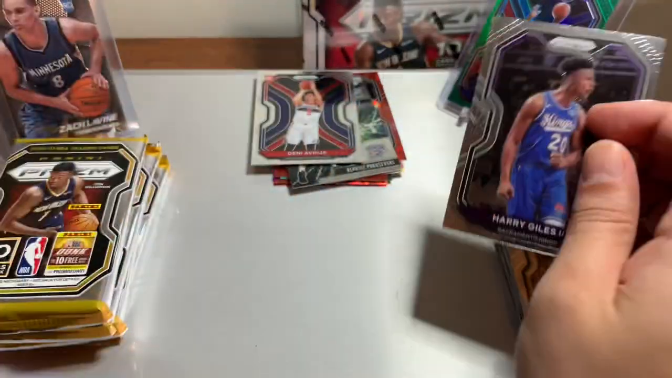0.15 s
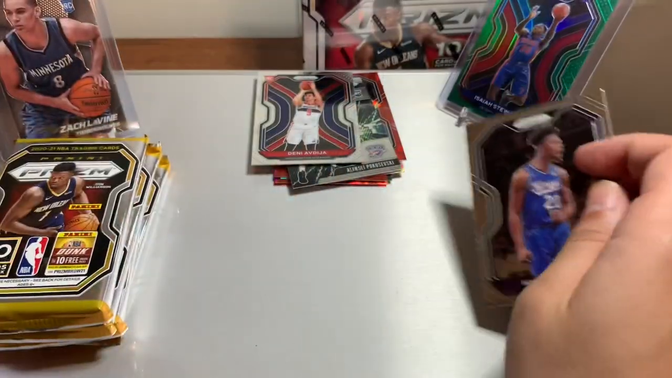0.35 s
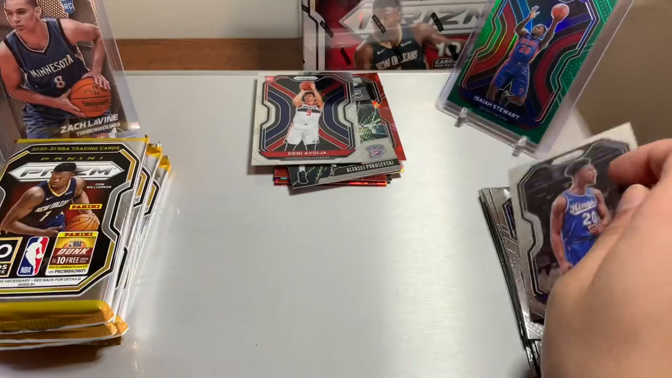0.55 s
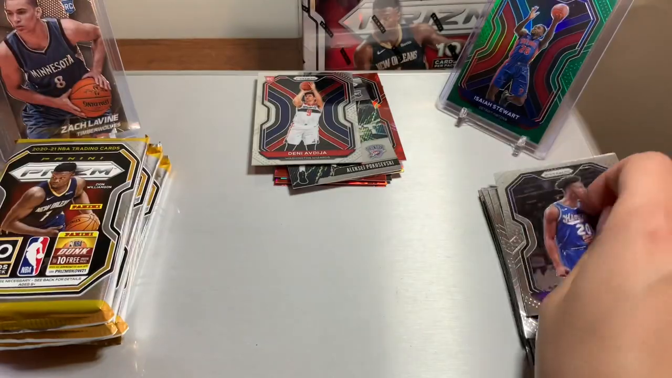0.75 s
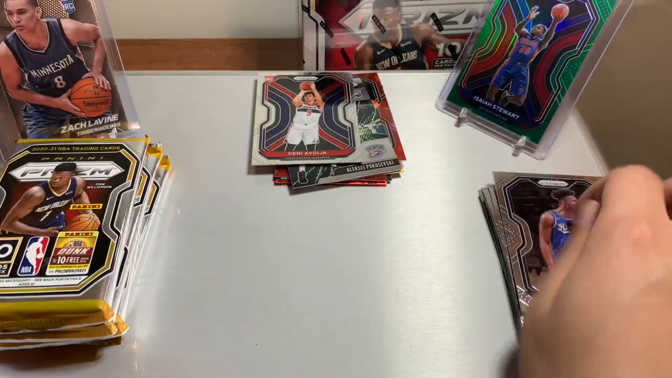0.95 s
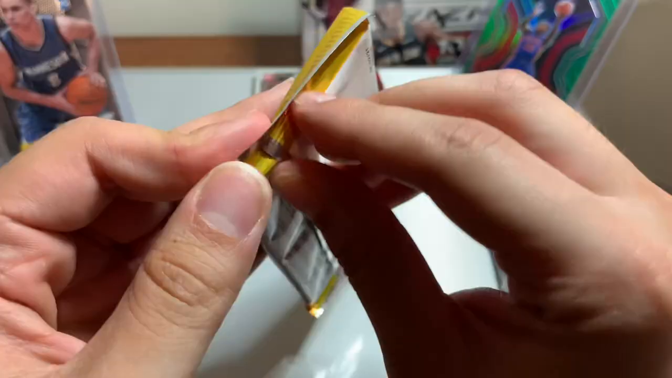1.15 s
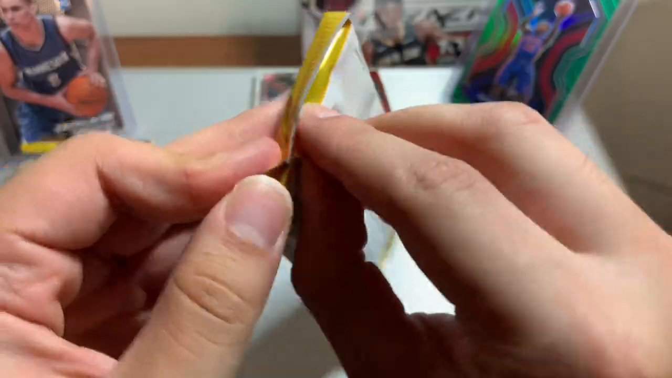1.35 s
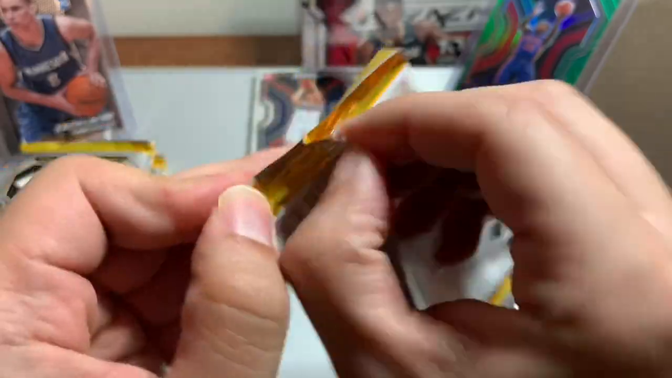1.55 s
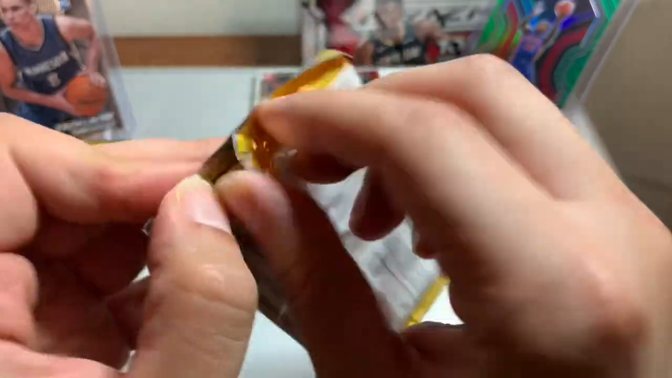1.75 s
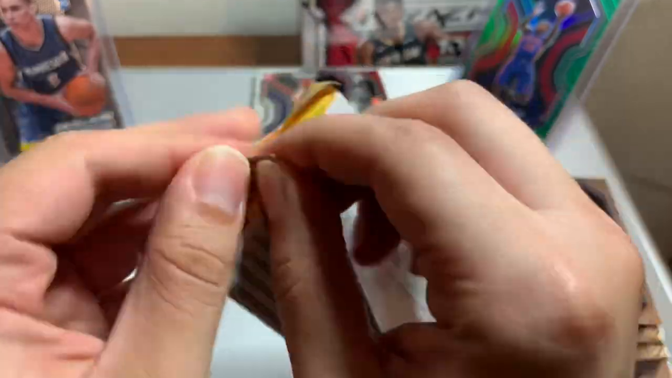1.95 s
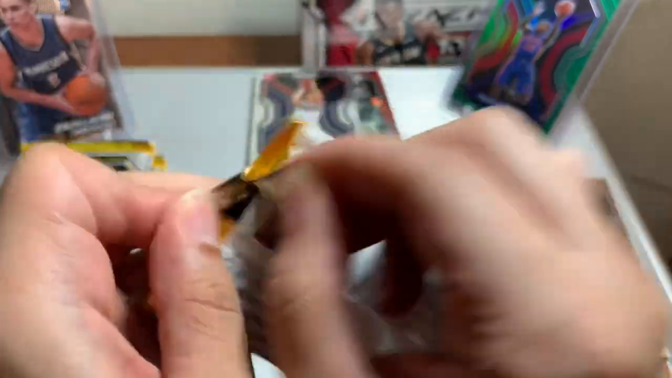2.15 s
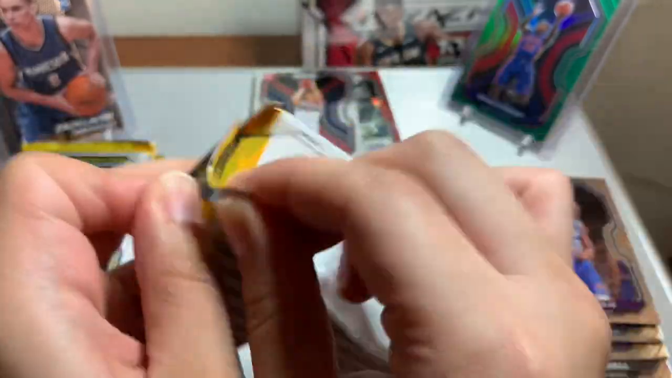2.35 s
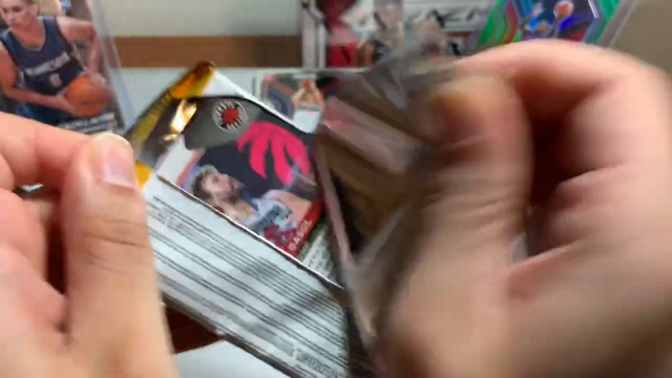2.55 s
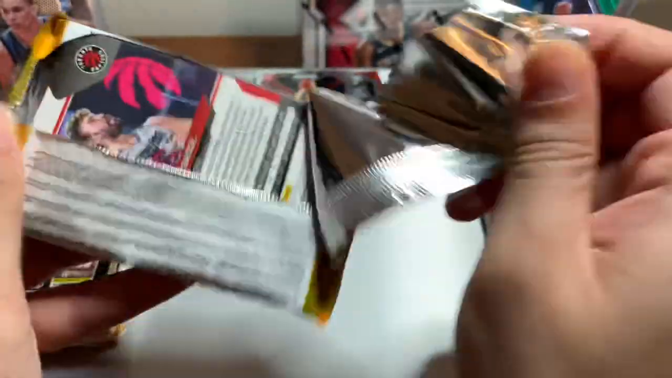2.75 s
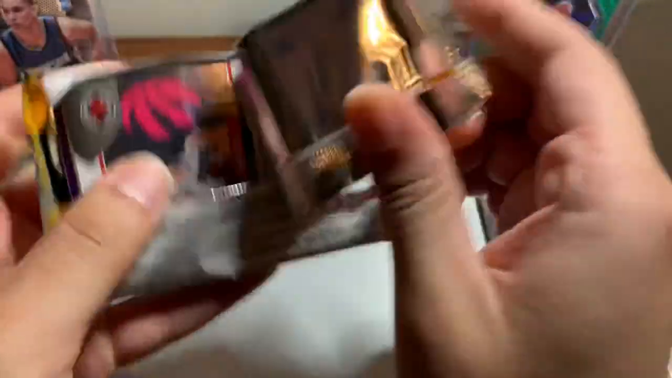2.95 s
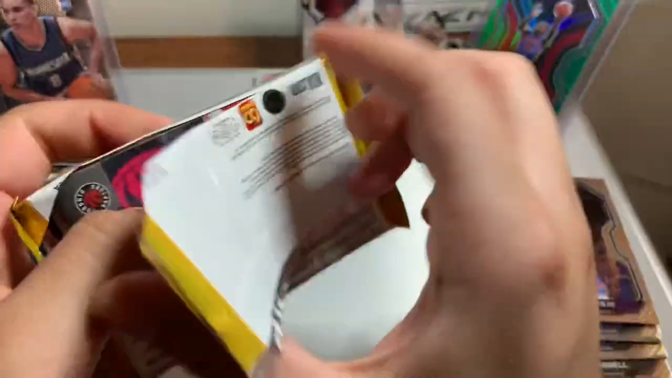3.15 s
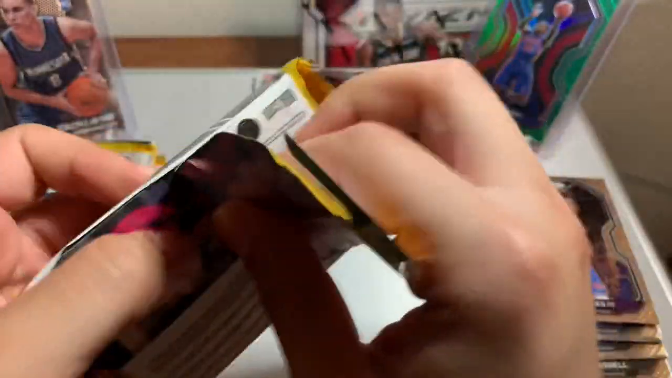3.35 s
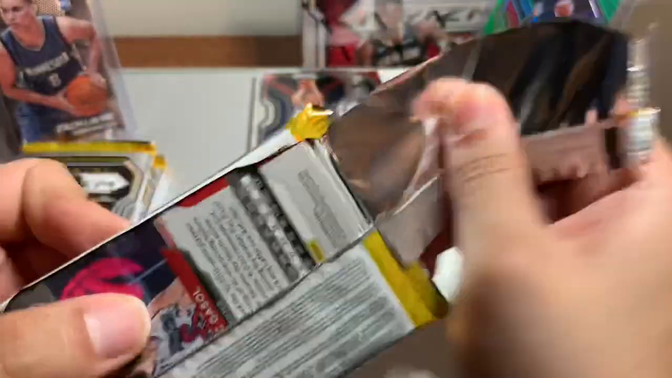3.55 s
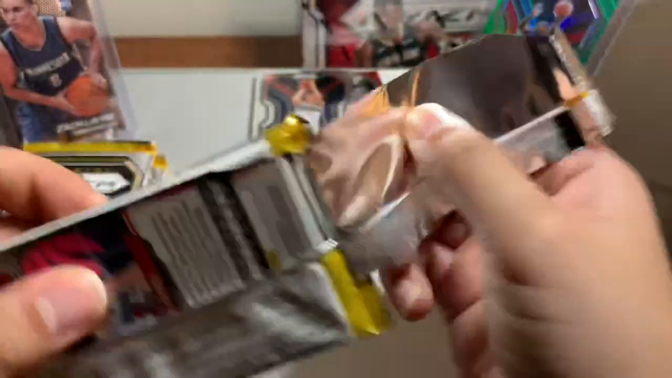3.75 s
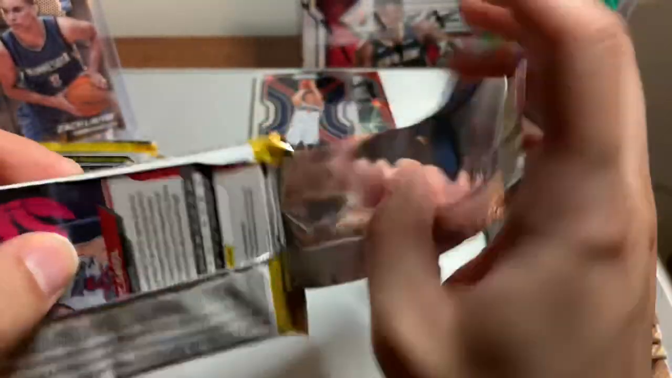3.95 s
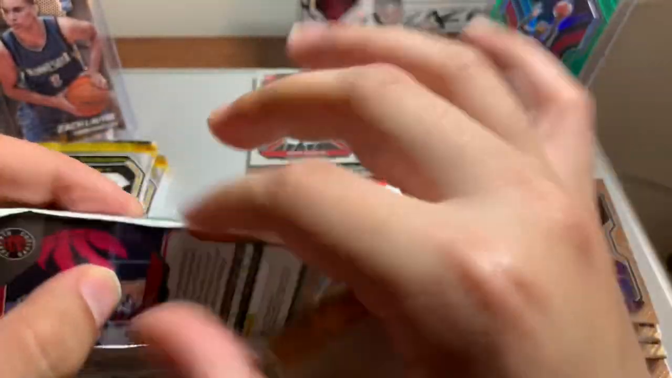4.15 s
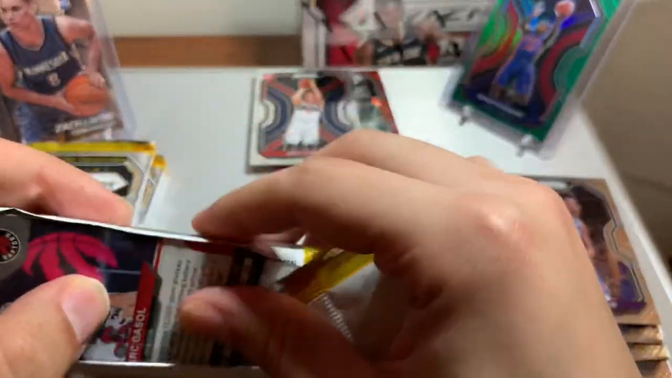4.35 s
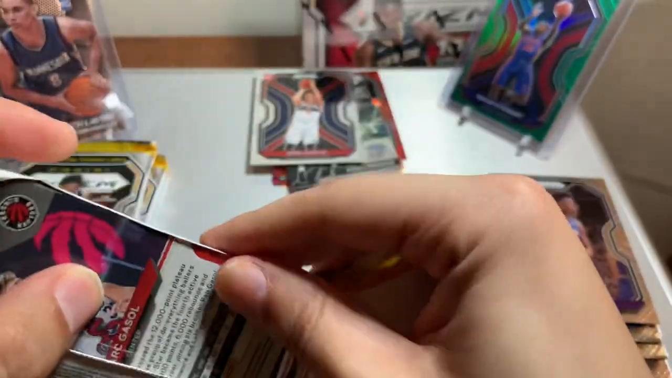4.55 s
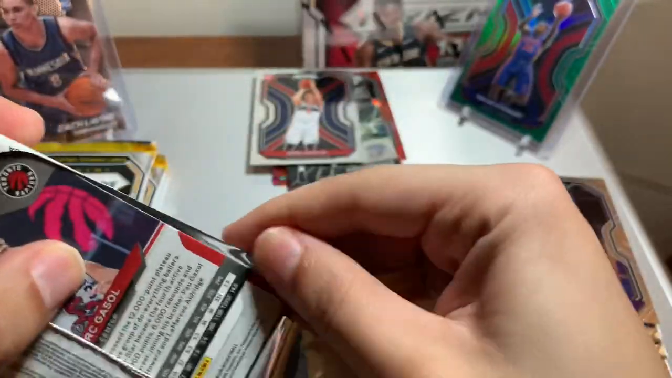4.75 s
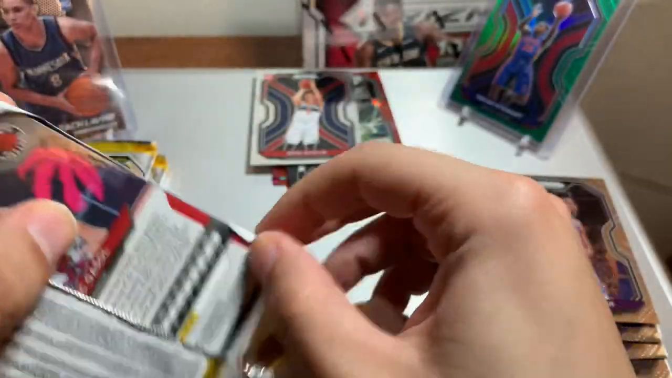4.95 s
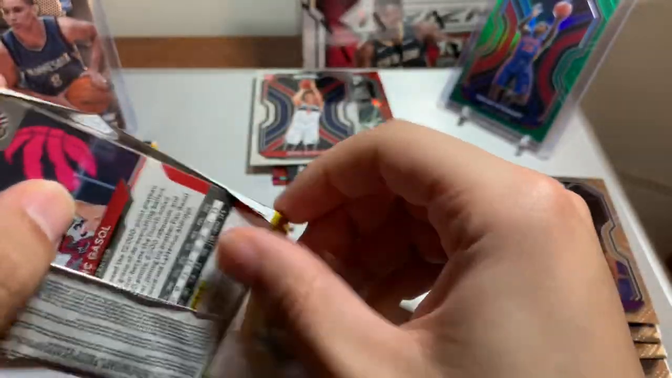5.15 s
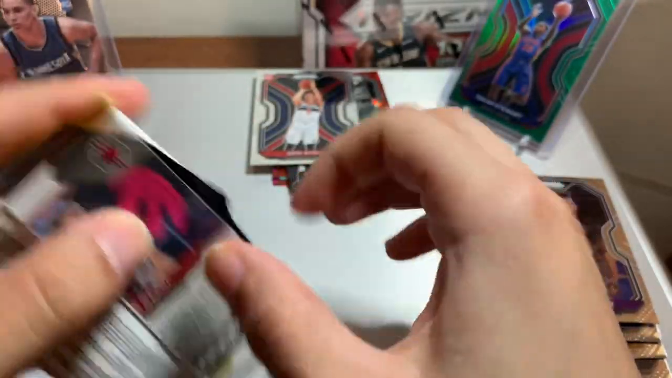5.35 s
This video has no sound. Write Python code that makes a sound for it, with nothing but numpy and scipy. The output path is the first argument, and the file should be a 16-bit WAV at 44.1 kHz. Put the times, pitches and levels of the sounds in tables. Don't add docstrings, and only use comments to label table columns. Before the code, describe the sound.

Quiet card taps in a hushed room, a brief lull, then loud close foil crackling, sharp tearing bursts and thinning rustles.

```python
import sys
import numpy as np
from scipy import signal
from scipy.fft import rfft, irfft
from scipy.io import wavfile
from scipy.ndimage import uniform_filter1d, map_coordinates

SR = 44100
rng = np.random.default_rng(int(sys.argv[2]) if len(sys.argv) > 2 else 0)


def volts_from_db(level):
    exponent = np.asarray(level, float) / 20
    return 10 ** exponent


def waveform_to_disk(signal):
    frames = np.transpose(np.atleast_2d(signal))
    scaled = np.clip(frames, -1, 1) * 32767
    samples = np.round(scaled).astype(np.int16)
    wavfile.write(sys.argv[1], SR, samples)


N = 238581
HZ = np.fft.rfftfreq(N + N % 2 + 4096, 1 / SR)
LONG = 2 * (len(HZ) - 1)
FOIL_START_S = 1.186
TURN_HZ = 5300


def evened(x):
    return x / np.sqrt(np.mean(x ** 2) + 1e-20)


def drift(shape, width):
    noise = rng.standard_normal(shape)
    return evened(uniform_filter1d(uniform_filter1d(noise, width), width))


def read(points, hz):
    f, value = np.transpose(points)
    return np.interp(np.log(hz + 1), np.log(f + 1), value)


def band(x, lo_hz, hi_hz):
    sos = signal.butter(3, [lo_hz, min(hi_hz, SR / 2.1)], "band", fs=SR, output="sos")
    return signal.sosfilt(sos, x)


def curves(rows, slower=0.74):
    t = np.arange(0, N + 32, 32) / SR
    s, db, rise, fall = np.array(rows)[:, :4].T[..., None]
    away = np.maximum((s - t) / rise, (t - s) / fall) / slower
    return volts_from_db(db - 20 * away)


def total(swells, rest_db):
    level = np.sqrt((swells ** 2).sum(0) + volts_from_db(rest_db) ** 2)
    return np.interp(np.arange(N), np.arange(len(level)) * 32, level)


# pitch_hz, likeness [0-1]
PORT_LIKENESS = [(60, .92), (900, .8), (1400, .35), (2500, .5), (3300, .25), (4200, .55), (5400, .15),
                 (6600, .8), (8400, .95), (16000, .9)]
# pitch_hz, left_over_right_db
LEFT_LOUDER = [(60, 1.5), (130, 4), (290, 3.5), (640, 9.5), (1410, 8.5), (3100, -0.5), (6820, -1.5),
               (15000, -0.5)]
# pitch_hz, left_lag_radians
HOUSING_TURN = [(350, -.5), (1100, .2), (1400, 3), (3000, 3), (3500, 1), (4500, 0), (5300, -1.)]


def ports(views):
    a, b = rfft(views, LONG)
    like = np.clip(read(PORT_LIKENESS, HZ), 0, 1)
    tilt = volts_from_db(read(LEFT_LOUDER, HZ) / 2)
    treble_lag_s = .000207
    lag = read(HOUSING_TURN, HZ) + 2 * np.pi * np.maximum(HZ - TURN_HZ, 0) * treble_lag_s
    left = a * tilt * np.exp(-1j * lag)
    right = (like * a + np.sqrt(1 - like ** 2) * b) / tilt
    return irfft([left, right], LONG)[:, :N]


# pitch_hz, level_db [per Hz]
HUSH_COLOUR = [(18, -38), (30, -20), (70, -14.5), (168, -9), (461, -36), (6710, -48.5), (8750, -44.5),
               (11400, -44), (15300, -48), (17000, -75)]


def hush():
    z = rfft(rng.standard_normal((2, LONG))) * volts_from_db(read(HUSH_COLOUR, HZ))
    low = irfft(z * (HZ < TURN_HZ), LONG)[:, :N]
    high = irfft(z * (HZ >= TURN_HZ), LONG)[:, :N]
    x = low + ports(high)
    return volts_from_db(-69.5) * x / band(x, 199, 17000).std()


# peak_s, level_db, rise_s, fall_s
DESK_BUMPS = [(0.0, -45, 0.038, 0.025), (.69, -55.5, 1.14, 0.13), (1.42, -39.5, 0.015, 0.15),
              (1.51, -45, 0.23, 0.15), (2.17, -56, 0.11, 0.045), (2.4, -63, 0.3, 1.2),
              (3.3, -60.5, 2.6, 0.57), (3.48, -43, 0.041, 0.072), (3.95, -56.5, 0.39, 2.3),
              (4.75, -52.5, 0.087, 0.15), (5.2, -58.5, 0.32, 1.5)]
# peak_s, level_db, rise_s, fall_s
AIR_GUSTS = [(.33, -47, 0.088, 0.17), (1.43, -53.5, 0.23, 0.21), (2.23, -45, 0.059, 0.071),
             (2.59, -34, 0.056, 0.087), (2.65, -35, 0.24, 0.066), (2.79, -44, 0.032, 0.041),
             (2.91, -41.5, 0.025, 0.031), (3.27, -46, 0.0037, 0.11), (3.46, -25, 0.024, 0.041),
             (3.83, -35, 0.019, 0.0051), (3.93, -49, 0.47, 0.18), (4.04, -54, 0.013, 0.36),
             (5.3, -54, 0.26, 0.74)]


def rumble():
    desk_rest_db, air_rest_db = -66.5, -69.5
    deep, air = rng.standard_normal((2, 2, N))
    deep = band(band(deep, 45.3, 165), 19.0, 79.6)
    deep = evened(deep) * volts_from_db(6.5) * total(curves(DESK_BUMPS), desk_rest_db)
    air = band(band(air, 100, 398), 100, 398)
    air = signal.lfilter([.02], [1, -.98], air)
    return deep + evened(air) * total(curves(AIR_GUSTS), air_rest_db)


# lowest_hz, highest_hz, rise_s, fade_s [60 dB]
SHEET_FAMILIES = [
    (5300, 20400, 0.0001, 0.0047),
    (1490, 5010, 0.00036, 0.01),
    (255, 1237, 0.00063, 0.0095),
]


def rings(count, ring=0.99, size=1400, colour_db=0.5):
    t, out = np.arange(size) / SR, []
    noise = rng.standard_normal((count, 3, 2, size))
    life = rng.random((count, 3, 1, 1))
    lumps = drift((count, 1, 1, size // 2 + 1), 30)
    noise = irfft(rfft(noise) * volts_from_db(colour_db * lumps), size)
    for k, (lo_hz, hi_hz, rise, t60) in enumerate(SHEET_FAMILIES):
        age = t / (ring * t60 * (.8 + .4 * life[:, k]))
        fall = volts_from_db(-60 * age) + volts_from_db(-20 - 12 * age)
        fall = fall * np.linspace(1, 0, size)
        onset = (1 - np.exp(-t / rise)) ** 2
        sound = band(noise[:, k] * fall * onset, lo_hz, hi_hz)
        sound = sound / np.linalg.norm(sound, axis=-1, keepdims=True)
        out.append(sound * np.sqrt(0.025 * ring * t60 * SR))
    return np.stack(out, 1)


def strike(rows, family_db, ring=1., colour_db=2.6):
    out = np.zeros((2, N + 1400))
    gains = volts_from_db(np.transpose(family_db))[..., None, None]
    sounds = (rings(count=len(rows), ring=ring, colour_db=colour_db) * gains).sum(1)
    for row, sound in zip(rows, sounds):
        out[:, round(row[0] * SR):][:, :1400] += sound
    return out[:, :N]


# pitch_hz, fade_s [60 dB]
ROOM_FADE = [(300, 0.043), (2000, 0.17), (6000, 0.091), (15000, 0.0081)]


def room(x):
    taps = np.zeros((2, SR // 2))
    at = np.arange(60, SR // 2 - 20, 20) + rng.integers(0, 20, (2, (SR // 2 - 61) // 20))
    np.put_along_axis(taps, at, rng.choice([-1., 1.], at.shape), 1)
    hz, t, z = signal.stft(taps, SR, nperseg=128)
    fading = volts_from_db(-60 * t / read(ROOM_FADE, hz)[:, None])
    tail = signal.istft(z * fading, SR, nperseg=128)[1]
    return signal.fftconvolve(x, tail / np.linalg.norm(tail[0]), axes=1)[:, :N]


# start_s, middle_db, treble_db [over middle], low_db [over middle]
CARD_TAPS = [(0.0938, -57, 13.5, -24), (0.1662, -55.5, 4, -19), (0.279, -53.5, -12, -6),
             (0.3098, -33, -9, -1.5), (0.335, -39.5, -33, -29), (0.363, -63, -22, -8), (0.5, -70, 25, -24),
             (0.816, -53, 1, -14), (0.8585, -54.5, 5, -12), (0.531, -70.5, -8, 4), (0.852, -60, 15, -10)]


def cards():
    _, db, high_db, low_db = np.transpose(CARD_TAPS)
    levels = [db + high_db + 2.0, db + 1.0, db + low_db + 8.0]
    taps = strike(CARD_TAPS, levels, ring=1.5, colour_db=3.)
    a, b = signal.lfilter([.5], [1, -.75], taps)
    heard = np.array([0.88 * a, 0.17 * a + 0.76 * b])
    return heard + volts_from_db(-4.5) * room(heard)


# peak_s, pitch_hz, level_db, rise_s, fall_s
CARD_SQUEAKS = [
    (.168, 2600, -60, .002, .003),
    (.827, 2580, -65, .006, .006),
    (.829, 2020, -54, .009, .008),
    (.827, 1510, -66, .012, .01),
    (.829, 6900, -69, .008, .007),
    (.935, 950, -72, .004, .006),
    (.962, 1000, -70, .005, .008),
    (1.131, 1750, -72, .003, .012),
]


def squeaks():
    t, out = np.arange(N) / SR, np.zeros(N)
    wobble = evened(uniform_filter1d(rng.standard_normal(N), size=60))
    for s, hz, db, rise, fall in CARD_SQUEAKS:
        away = np.maximum((s - t) / rise, (t - s) / fall)
        out += volts_from_db(db - 20 * away ** 2) * np.sin(2 * np.pi * hz * t + 0.62 * wobble)
    return out * volts_from_db([[2.], [-1.5]])


# peak_s, treble_db, rise_s, fall_s, fullness_db [middle over treble]
HAND_SQUEEZES = [(1.223, -53, 0.029, 0.85, -4.5), (1.462, -31, 0.12, 0.039, -29),
                 (1.577, -46, 0.098, 0.078, -9), (1.694, -42, 0.1, 0.1, -7.5),
                 (1.813, -49.5, 0.19, 0.26, -9.5), (1.947, -43, 0.028, 0.059, 1.5),
                 (2.2, -31.5, 0.039, 0.072, -3.5), (2.326, -40, 0.044, 0.093, 5),
                 (2.59, -25, 0.058, 0.085, -1), (2.669, -33.5, 0.44, 0.093, -10.5),
                 (2.847, -44, 0.027, 0.23, 1.5), (3.017, -39.5, 0.056, 0.2, -13),
                 (3.279, -43.5, 0.12, 0.04, -20), (3.458, -32, 0.044, 0.056, -6),
                 (3.523, -30, 0.028, 0.017, -22), (3.574, -39, 0.03, 0.13, -5),
                 (3.828, -46, 0.3, 0.25, -3.5), (4.048, -41.5, 0.074, 0.3, -6),
                 (4.486, -42.5, 0.073, 0.065, -7.5), (4.587, -48.5, 0.069, 0.035, 0),
                 (4.721, -39, 0.086, 0.11, -9.5), (4.78, -47, 0.077, 0.03, -7),
                 (4.937, -42, 0.21, 0.28, -8.5), (5.173, -42.5, 0.029, 0.83, -2),
                 (5.348, -46, 0.069, 0.03, 1)]


def squeezing():
    hold_db = (-61, -65, -74)
    full_db = np.array(HAND_SQUEEZES)[:, 4:]
    body = curves(HAND_SQUEEZES, slower=0.94)
    swells = curves(HAND_SQUEEZES), body * volts_from_db(full_db), body * volts_from_db(-6.5 + 0.69 * full_db)
    touch = np.clip((np.arange(N) / SR - FOIL_START_S) / 0.0041, 0, 1)
    return touch * np.array([total(s, db) for s, db in zip(swells, hold_db)])


def crackle(per_s, spread_db):
    size = volts_from_db(spread_db * np.minimum(rng.exponential(1, N), 4))
    size = size * (rng.random(N) < per_s / SR)
    kind, out = rng.integers(0, 12, N), np.zeros((3, 2, N))
    for k, shape in enumerate(rings(count=12, size=700)):
        out += signal.oaconvolve((size * (kind == k))[None, None], shape, axes=2)[..., :N]
    return np.array([evened(family) for family in out])


def patchy(x, depth_db=4.0):
    z = signal.stft(x, nperseg=256)[2]
    patches = uniform_filter1d(rng.standard_normal(z.shape[1:]), size=9, axis=0)
    patches = evened(uniform_filter1d(patches, size=13, axis=1))
    return signal.istft(z * volts_from_db(depth_db * patches - 1.0), nperseg=256)[1][:, :N]


# start_s, length_s, treble_db, middle_db, low_db
TEARING_RUNS = [(1.463, 0.032, -53, -33, -45), (1.674, 0.031, -30.5, -43, -41),
                (2.149, 0.017, -24, -24.5, -46), (2.169, 0.064, -33.5, -34, -59),
                (2.771, 0.021, -49, -50, -49), (2.999, 0.04, -47, -41.5, -73),
                (4.471, 0.035, -40, -67, -49), (2.349, 0.015, -25, -31, -70), (2.55, 0.1, -54, -59, -32.5),
                (3.274, 0.015, -50, -49, -41), (3.43, 0.029, -30.5, -39, -36.5),
                (3.451, 0.019, -23.5, -23, -63), (3.506, 0.038, -32.5, -36.5, -63),
                (4.132, 0.024, -46, -49, -53)]


def handling():
    clumps = drift((3, N), 300)
    effort = squeezing() * volts_from_db(1.5 * (clumps + clumps[0]))
    t, tear = np.arange(N) / SR, np.zeros((3, N))
    for s, length, *db in TEARING_RUNS:
        u = np.clip((t - s) / length, 0, 1)
        tear += volts_from_db(db)[:, None] * np.sin(np.pi * u ** 0.62) ** 0.22
    crumpled = crackle(per_s=2800, spread_db=2.9) * effort[:, None]
    torn = crackle(per_s=2900, spread_db=0.5) * tear[:, None]
    return patchy((crumpled + torn).sum(0))


# start_s, treble_db, middle_db [over treble]
CREASE_SNAPS = [(1.248, -30, -10), (1.2619, -19, -18), (1.2814, -35.5, -1), (1.3046, -29.5, -4.5),
                (1.3154, -40.5, 7.5), (1.4014, -25.5, -20), (1.4136, -20, -29), (1.4385, -32, -7),
                (1.4531, -28, -20), (1.4612, -28, -23), (1.4752, -15, -16), (1.4952, -14.5, -11),
                (1.505, -12, -11), (1.5617, -25, -8.5), (1.5764, -6.5, -18.5), (1.5862, -13, -37),
                (1.618, -18.5, -12.5), (1.6447, -25, -20), (1.6769, -16, -7), (1.6828, -7.5, -12.5),
                (1.703, -6, -13), (1.7234, -20, -34), (1.7391, -7, -28), (1.8032, -15.5, -11.5),
                (1.8579, -10.5, -16), (1.8972, -19, -10), (1.932, -22.5, -16), (1.9365, -7, -11),
                (1.9534, -17.5, -10), (1.9904, -12.5, -15.5),
                (2.0015, -28.5, -3.5), (2.0688, -14, -4.5), (2.0824, -27, -1), (2.1107, -21, -14),
              (2.118, -15, -10.5), (2.1292, -10.5, -14), (2.154, -6.5, -11), (2.164, -13, -14),
              (2.1994, -10, -10), (2.2422, -14, -18), (2.269, -19, -21), (2.3145, -22.5, -5.5),
              (2.356, -14, -18), (2.377, -15, -13), (2.3978, -11, -7.5), (2.4657, -15.5, -16.5),
              (2.5127, -15, -10), (2.561, -20.5, -19), (2.5728, -3.5, -20.5), (2.6, -10.5, -37),
              (2.6475, -3.5, -15), (2.6583, -9, -16.5), (2.672, -9.5, -25), (2.6955, -11, -21),
              (2.7469, -14, -21), (2.8, -15.5, -16.5), (2.8345, -22.5, -10), (2.8416, -19.5, -10),
              (2.899, -15.5, -12.5), (2.9068, -16.5, -30),
                (2.935, -24, -31), (3.005, -31.5, -9), (3.0659, -16, -21), (3.077, -28, -24),
              (3.1221, -22, -17), (3.135, -20.5, -29), (3.169, -24, -51), (3.268, -25.5, -6.5),
              (3.2769, -8.5, -38), (3.2843, -18, -10.5), (3.3059, -25, -18.5), (3.354, -37, -11),
              (3.3891, -21.5, -19.5), (3.4124, -9, -10.5), (3.43, -28, -5), (3.453, -10, -38),
              (3.461, -21, -20), (3.469, -18, -28), (3.511, -20, -18), (3.562, -9.5, -13),
              (3.5748, -13.5, -16.5), (3.602, -4.5, -50), (3.6087, -31, -38), (3.695, -25.5, -10),
              (3.7343, -47.5, 12), (3.797, -30.5, -6), (3.866, -33.5, -17), (3.88, -31.5, -17),
              (3.919, -22.5, -22), (3.9295, -17.5, -18.5),
                (4.012, -27.5, -12.5), (4.0395, -9.5, -40), (4.0481, -13.5, -21), (4.0762, -23, -12.5),
               (4.1021, -32, -21), (4.144, -27.5, -8), (4.224, -33.5, -2), (4.3475, -35, -5),
               (4.3782, -27.5, -3), (4.4052, -39, 1), (4.4171, -27.5, -8), (4.4654, -32, -33),
               (4.476, -25, -38), (4.4962, -20.5, -18), (4.6916, -31, -10.5), (4.7213, -36, -13),
               (4.774, -35, -32), (4.848, -26.5, -24), (4.8608, -29, -5.5), (4.939, -23.5, -9),
               (5.008, -15, -42), (5.0732, -24, -15), (5.155, -33, -19), (5.1779, -20.5, -14.5),
               (5.251, -36, -3), (5.3248, -42, -16), (5.344, -29, -4), (5.351, -13.5, -21),
               (5.376, -37, -25), (5.395, -22.5, -10)]


def snaps():
    rows = CREASE_SNAPS
    _, db, middle_db = np.transpose(rows)
    return strike(rows, [db + 6.0, db + middle_db + 9.5, db + middle_db - 14.0])


# start_s, treble_db, middle_db [over treble]
SMALL_CREASES = [(1.3163, -46, 4), (1.3769, -39, -27), (1.3913, -25.5, -19), (1.3973, -31, -12),
                 (1.4058, -23.5, -23), (1.4171, -18, -19), (1.4445, -26, -15), (1.4608, -14, -15),
                 (1.4665, -19, -18), (1.4877, -40, 5), (1.499, -22.5, -0.5), (1.5273, -28, -6),
                 (1.5614, -33, -25), (1.5671, -33, -13), (1.5861, -17, -36), (1.6421, -43, -17),
                 (1.6705, -27, -27), (1.6796, -23, -21), (1.7112, -15.5, -8), (1.7231, -10, -32),
                 (1.8036, -17, -27), (1.812, -27.5, -3), (1.817, -26.5, -18), (1.8199, -32, -8),
                 (1.8315, -31, 1.5), (1.8479, -29, -9), (1.8915, -38, -4), (1.9318, -23, -8),
                 (1.9383, -7.5, -10), (1.9717, -25, -10), (2.0051, -29, -9), (2.0141, -44, -3),
                 (2.094, -32, -9), (2.0999, -32, -12.0), (2.107, -22, -11), (2.1255, -17, -11),
                 (2.1409, -28, -7), (2.195, -10, -17), (2.2325, -44, -13.5), (2.2377, -37.5, 8),
                 (2.2467, -15.5, -17), (2.2969, -36.5, -1), (2.2999, -26, -2.5), (2.3191, -15.5, -16),
                 (2.3356, -28.5, -4.5), (2.3388, -33, -7), (2.3413, -32, -12.0), (2.3672, -25, -4),
                 (2.4119, -54, -6), (2.432, -42, 6.5), (2.4483, -38, 3), (2.5895, -18.5, -7),
                 (2.615, -19.5, -18), (2.6436, -20.0, -12), (2.6727, -11, -20), (2.6777, -14, -18.5),
                 (2.686, -21, -12), (2.6895, -17, -26),
                 (2.722, -38, 5), (2.7315, -31, -18), (2.7697, -37, -10), (2.7778, -33, -8),
                (2.7872, -31, -22), (2.791, -32, -16), (2.7956, -17.5, -6), (2.7998, -16, -20),
                (2.8316, -24, -14), (2.838, -20, -15), (2.8536, -28.5, 2), (2.8934, -30.5, 4),
                (2.932, -35, -22), (2.9441, -26, -14), (2.954, -32, 5.5), (3.001, -32, -14),
                (3.055, -31, -7), (3.07, -44, -22), (3.0775, -30, -24), (3.083, -28, -7),
                (3.1115, -29, -21), (3.139, -27, -23), (3.1737, -42, -29), (3.2039, -46, -15.0),
                (3.2609, -27, -18), (3.2768, -11, -24), (3.28, -21, -19), (3.3387, -42, -12.0),
                (3.356, -34, -21), (3.361, -33, -19.5), (3.3736, -34, -15.5), (3.515, -22.5, -9.5),
                (3.568, -29, -1), (3.602, -12, -36), (3.6082, -12.5, -31), (3.7344, -55, -12),
                (3.7988, -27, -14), (3.8346, -39, 3), (3.8805, -19, -9.5), (4.0995, -21.5, -18),
                (4.1475, -18, -21), (4.3007, -58, -2), (4.3364, -43, -16), (4.3736, -32, -3.5),
                (4.4, -43, -10), (4.407, -32.5, -5), (4.5917, -41, -21), (4.849, -41, -27), (4.91, -32, -9),
                (4.9383, -16, -42), (4.983, -32, -27), (5.1424, -34.5, -10), (5.159, -29, -10),
                (5.2597, -36, -11), (5.2744, -40, -16), (5.287, -29.5, -16), (5.341, -28.5, -7),
                (5.3756, -40, -14.0)]


def ticks():
    rows = SMALL_CREASES
    _, db, middle_db = np.transpose(rows)
    return strike(rows, [db + 5.0, db + middle_db + 8.0, db + middle_db - 19.5], ring=0.81)


# start_s, treble_db
BRIGHT_SNAPS = [(1.3953, -24), (1.4062, -17), (1.4468, -28), (1.4484, -8), (1.4514, -6), (1.4542, -2),
                (1.4562, -12), (1.458, -14), (1.4621, -8), (1.464, -5.5), (1.466, -14), (1.4694, -19),
                (2.1544, -3), (2.583, -15), (2.5854, -13.5), (2.5934, -9), (2.6152, -17), (2.6866, -19),
                (3.4527, -9), (3.4624, -18), (3.6074, -13), (4.0393, -2.5), (4.0521, -23), (4.6982, -37),
                (4.7252, -30), (5.2233, -23), (5.2417, -30), (5.2553, -28), (5.28, -34), (5.35, -4)]


def bright_snaps():
    _, db = np.transpose(BRIGHT_SNAPS)
    return strike(BRIGHT_SNAPS, [db + 3.5, db - 16.0, db - 27.0], ring=0.45)


# start_s, low_db
PANEL_FLAPS = [(1.43, -35), (1.679, -40), (1.935, -63), (1.999, -47.5), (2.069, -39), (2.154, -22.5),
               (2.196, -44), (2.315, -35), (2.352, -32), (2.512, -25.5), (2.649, -16), (2.745, -30),
               (2.796, -28.5), (2.841, -35), (3.275, -46), (3.459, -14.5), (3.561, -29), (3.601, -32),
               (3.817, -26), (3.878, -36), (3.915, -27.5), (4.037, -19.5), (4.225, -35.5), (4.285, -38.5),
               (4.348, -44.5), (4.376, -30), (5.008, -30), (5.157, -33.5), (5.252, -36), (5.35, -27.5)]


def flaps():
    _, db = np.transpose(PANEL_FLAPS)
    return strike(PANEL_FLAPS, [db - 42, db - 5.0, db + 5.5], ring=0.87)


# pitch_hz, level_db
FOIL_COLOUR = [(200, 0), (500, -4.5), (950, -1), (1280, -3), (2000, -3), (4000, -1), (5500, -2.5),
               (7000, 4.5), (10000, 5.5), (13000, 2), (15500, -2.5), (16800, -24), (17300, -54)]


def shine(x):
    return irfft(rfft(x, LONG) * volts_from_db(read(FOIL_COLOUR, HZ)), LONG)[:, :N]


def shifting(x, samples=.14):
    when = np.arange(N) + samples * drift(N, 1500)
    return np.array([map_coordinates(x[0], [when], order=5), x[1]])


def scene():
    t = np.arange(N) / SR
    lull = np.where(t < FOIL_START_S, np.clip((FOIL_START_S - t) / 0.018, .03, 1), 1)
    still = lull * hush() + cards() + squeaks()
    foil = shine(handling() + snaps() + flaps())
    near = foil + volts_from_db(-17.0) * room(foil) + rumble()
    return still + shifting(ports(near + shine(ticks()))) + ports(shine(bright_snaps()))


def top_cut(x):
    return signal.sosfilt(signal.butter(12, 17140, fs=SR, output="sos"), x)


def record(dry):
    mix = 0.76 * np.tanh(dry / 1.003)
    return top_cut(mix)


dry = scene()
out = record(dry)
waveform_to_disk(out)
```